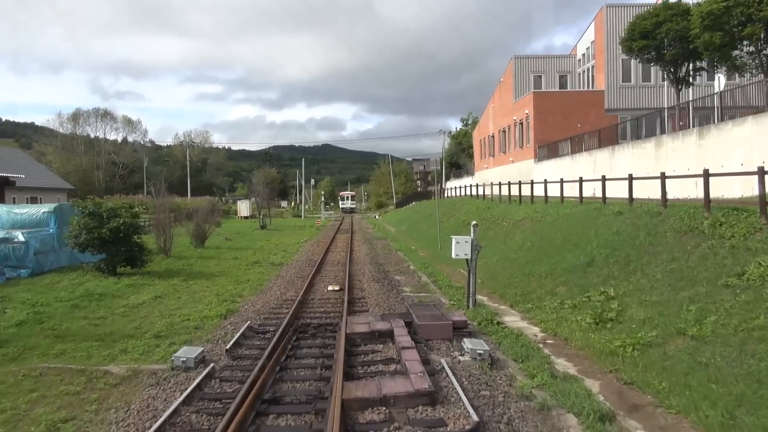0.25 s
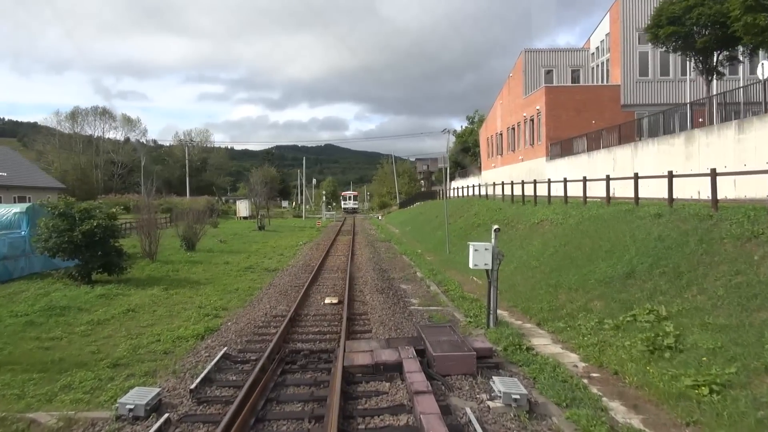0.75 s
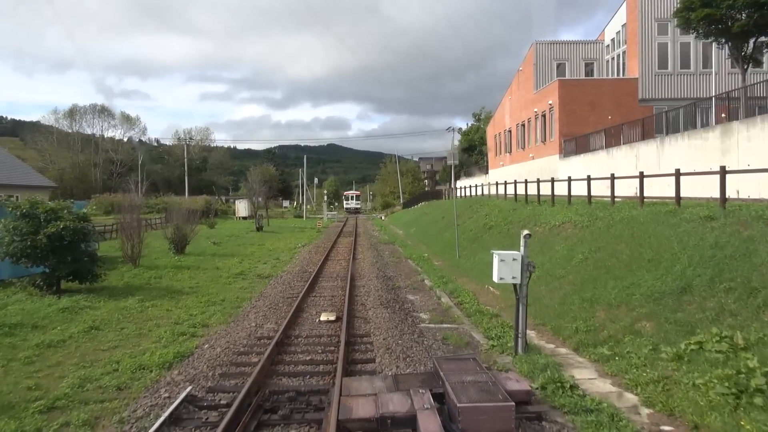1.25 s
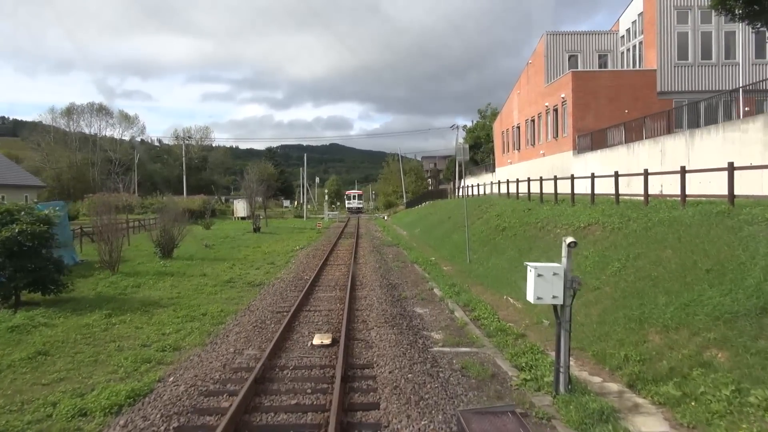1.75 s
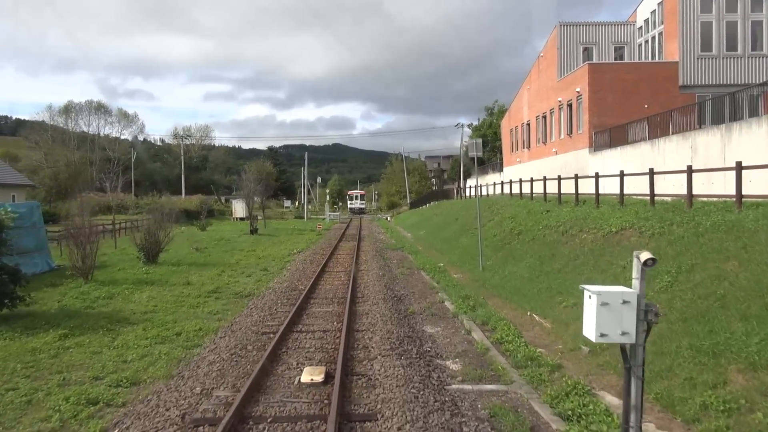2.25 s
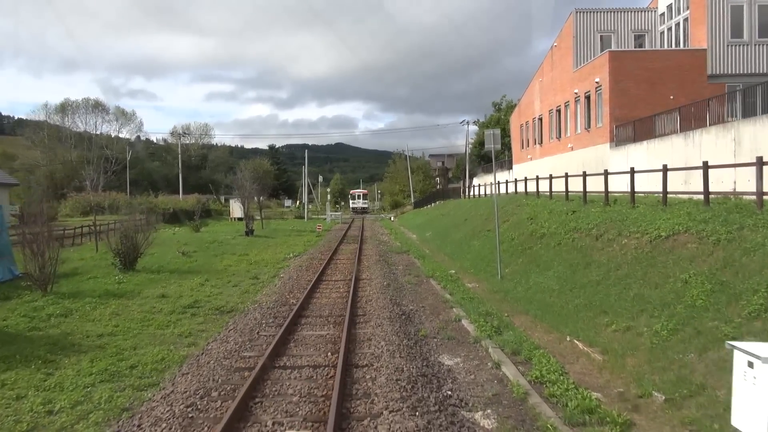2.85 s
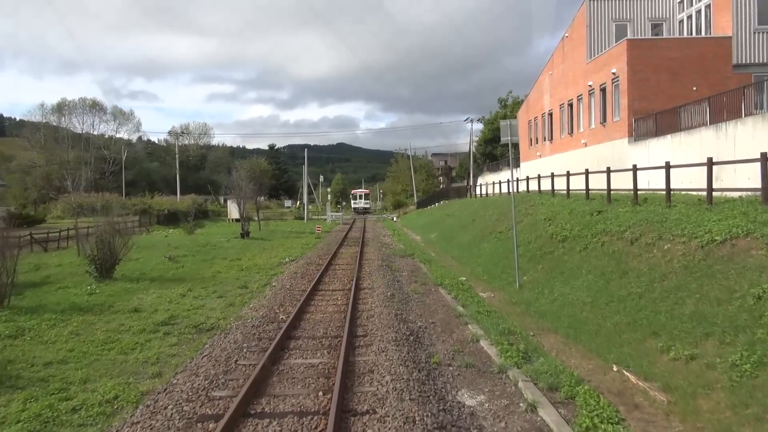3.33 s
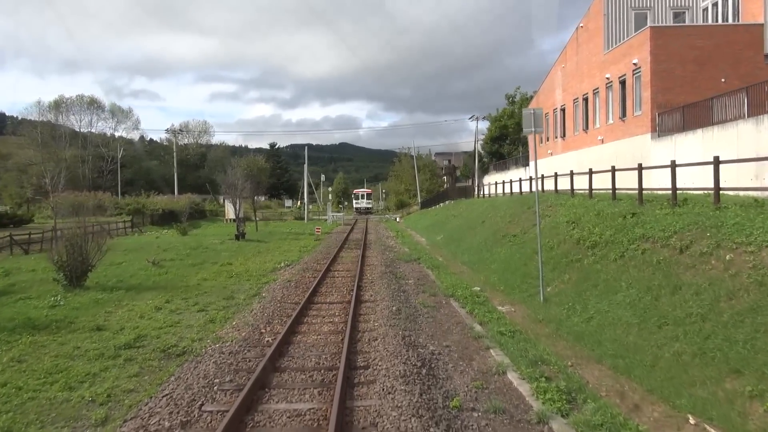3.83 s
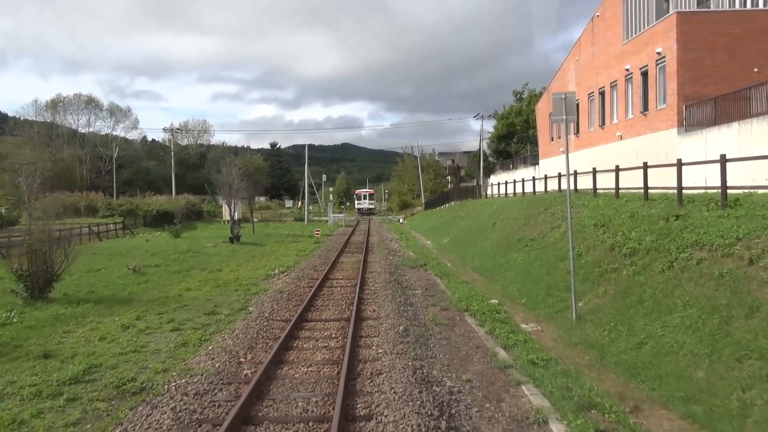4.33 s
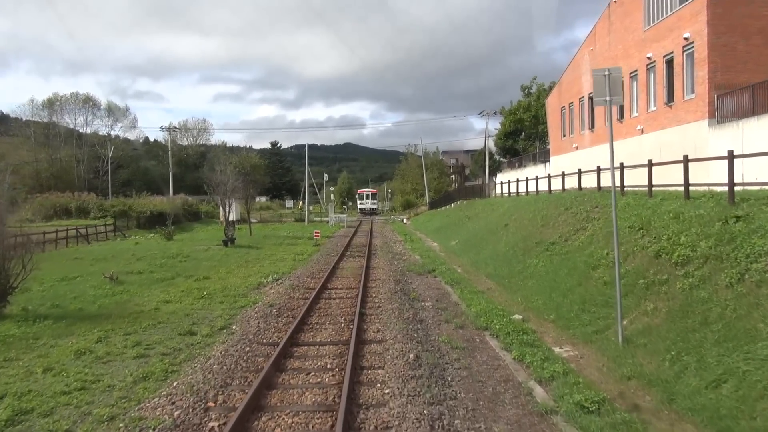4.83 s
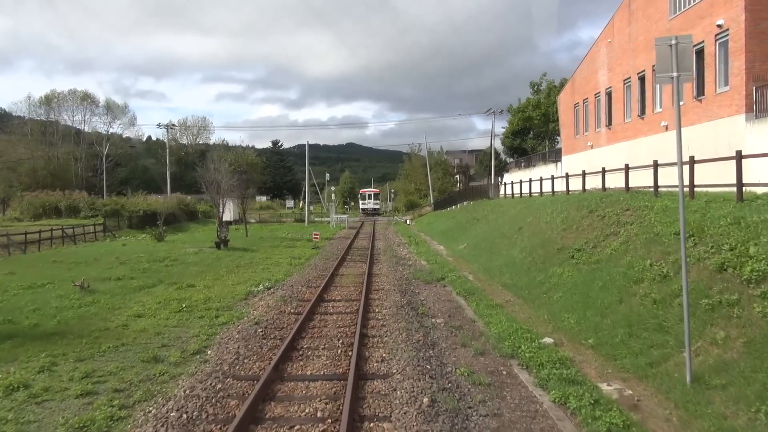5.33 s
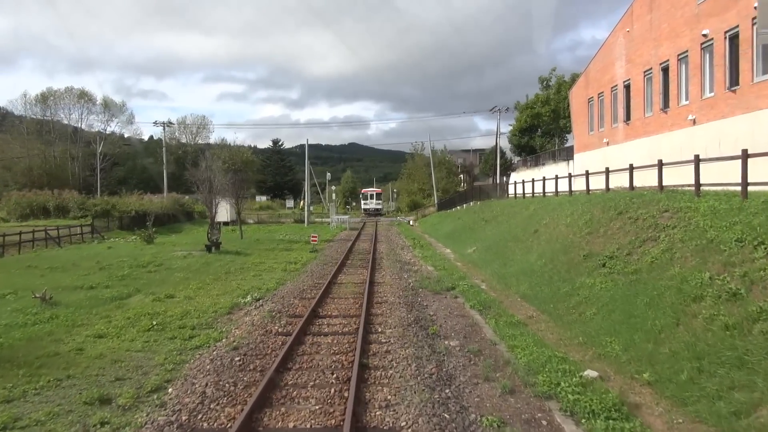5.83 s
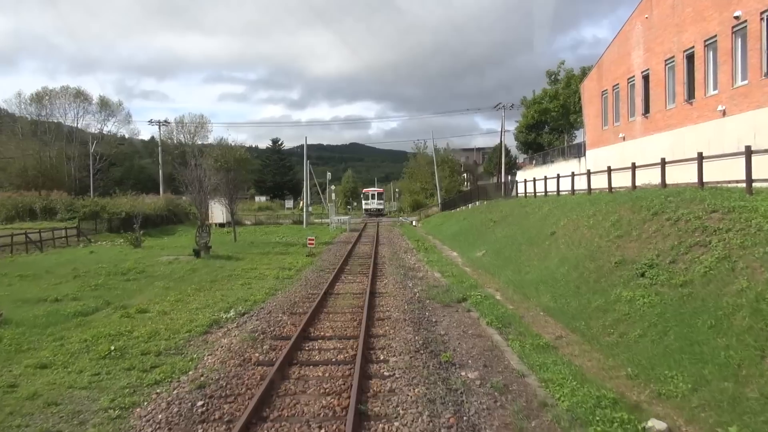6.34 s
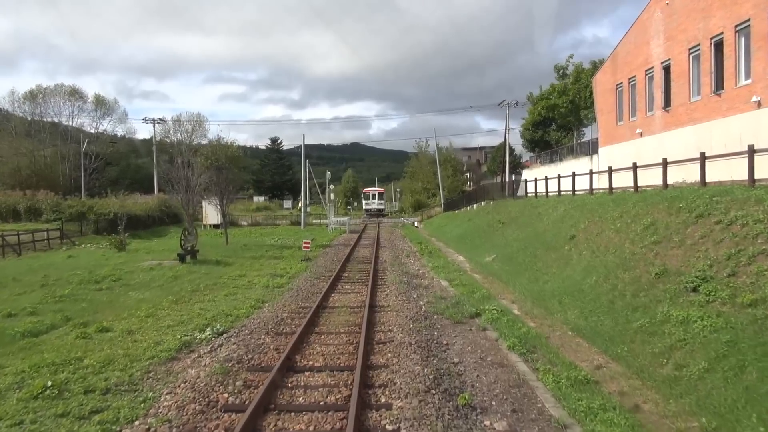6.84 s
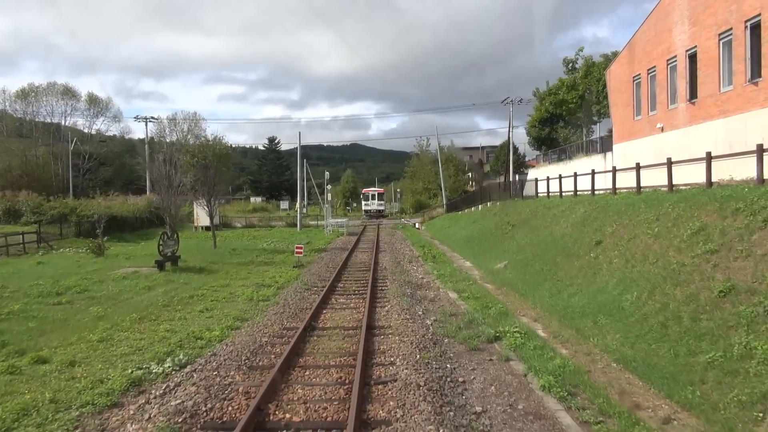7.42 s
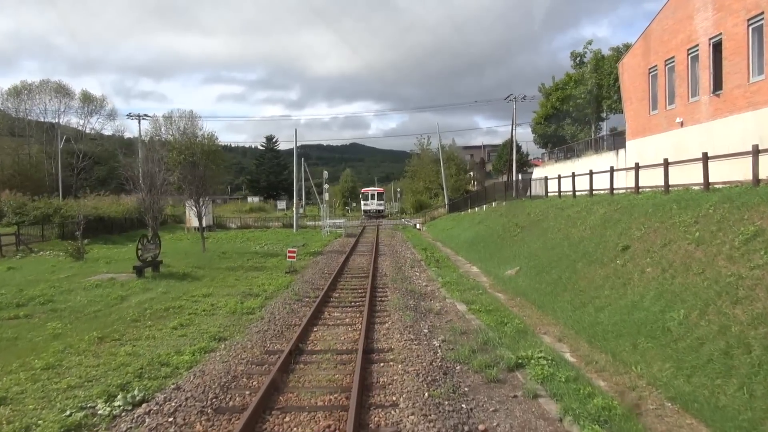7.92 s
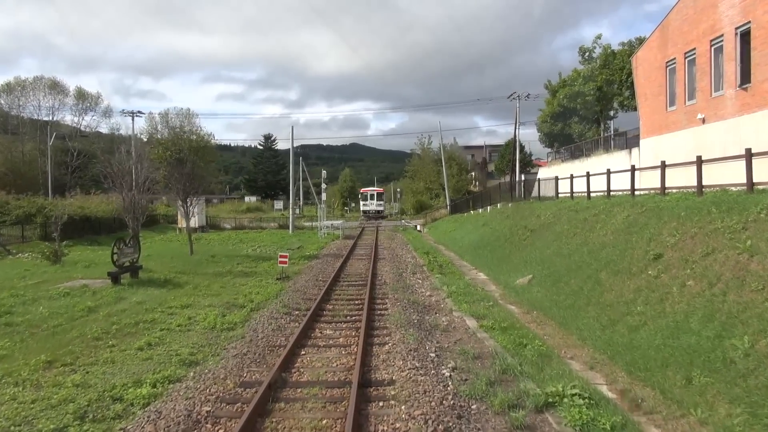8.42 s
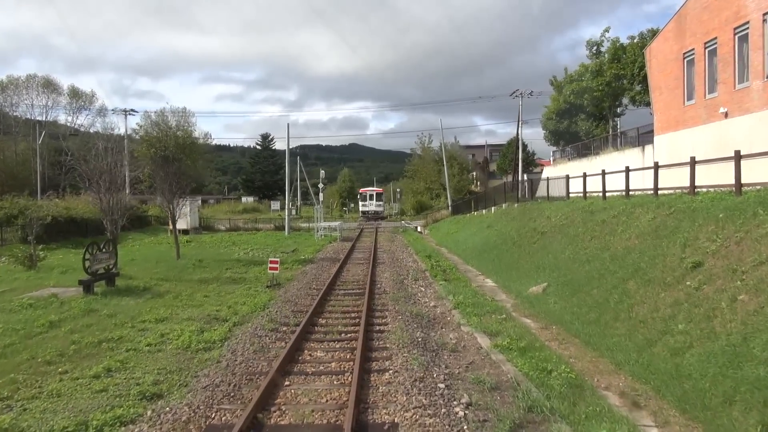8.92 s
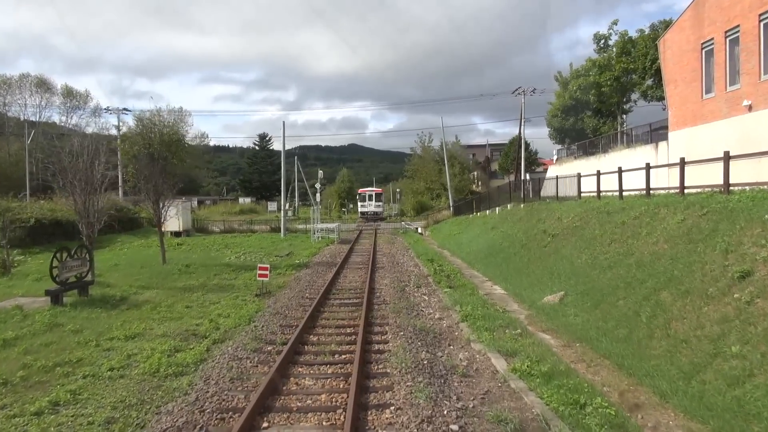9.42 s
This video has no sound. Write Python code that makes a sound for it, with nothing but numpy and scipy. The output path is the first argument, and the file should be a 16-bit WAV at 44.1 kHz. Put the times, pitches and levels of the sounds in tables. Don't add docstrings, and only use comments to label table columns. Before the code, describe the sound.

Inside a slow diesel railcar cab, engine hum and airy hiss run under booming rail-joint thumps, then brake-valve puffs, metallic clinks and faint squeaks.

```python
import sys
import numpy as np
from scipy import signal
from scipy.fft import rfft, irfft, next_fast_len
from scipy.io import wavfile
from scipy.ndimage import uniform_filter1d, minimum_filter1d, map_coordinates

SR = 44100
rng = np.random.default_rng(int(sys.argv[2]) if len(sys.argv) > 2 else 0)


def wav_out(sig):
    wavfile.write(sys.argv[1], SR, np.round(np.clip(np.atleast_2d(sig).T, -1, 1) * 32767).astype(np.int16))


def magnitude_from_level(level_db):
    exponent = np.asarray(level_db, float) / 20
    return 10 ** exponent


N = 426447

# (multiple of firing rate, level [dB])
HUM = [(1, -50), (4, -35), (8, -50), (9.5, -50)]
# (frequency [Hz], level per Hz [dB])
DRONE = [(260, -35), (440, -3), (503, -1.5), (589, 1.5), (690, -5.5), (790, 0.5), (858, 1.5), (907, -4.5),
         (1020, -5), (1170, -11), (1320, -12.5), (1420, -49), (1500, -11), (1950, -66), (3300, -120)]
# (frequency [Hz], level per Hz [dB])
HISS = [(710, -6.5), (1200, -6), (1320, -2.5), (1940, -2.5), (3180, -8.5), (4480, -11.5), (4930, -13.5),
        (5310, -12.5), (6650, -17), (7330, -13.5), (10400, -22), (11700, -24.5), (15500, -34.5)]
# (time [s], level [dB])
AIR = [(0.0, -44.5), (1.05, -43.5), (4.07, -43.5), (5.01, -45.5), (5.25, -45), (6.14, -42), (6.33, -43.5),
       (8.73, -43.5), (8.89, -43.5), (9.67, -43)]

# (frequency [Hz], width [Hz], level [dB])
CAB_AIR = [(67.7, 12.7, -13.5), (94.24, 12.4, 0), (100.7, 8.2, 0.5), (113.15, 8.4, -5), (130.2, 14, -10.5),
           (141.7, 18, -22)]
# (frequency [Hz], width [Hz], level [dB])
BENDING = [(47, 10.3, -1.5), (61.5, 14.5, -1.5)]
# (frequency [Hz], width [Hz], level [dB])
PANELS = [(161.3, 16.6, -1), (182, 11.3, -0.5), (217.8, 25.8, 0.5), (231.6, 18, -5), (246.4, 13.3, -5.5),
          (278.6, 22, -1.5), (305.8, 60, -6), (368, 32, -6), (414, 31, -5.5)]
# (time [s], level [dB])
TRACK = [(0.0, -40), (0.27, -26), (0.89, -22), (1.26, -25.5), (1.83, -23), (2.02, -31), (2.21, -26.5),
         (3.58, -24.5), (3.82, -22), (4.2, -23), (4.39, -24), (4.49, -25.5), (5.01, -25), (7.06, -23.5),
         (7.94, -21), (8.56, -23), (8.99, -24), (9.67, -24)]
# (time of peak [s], cab boom [dB], bending [dB], floor panels [dB])
JOLTS = [(0.01, -13.5, -27, -28), (0.41, -25, -46, -51), (0.73, -19, -26, -33), (0.97, -16, -34, -42),
         (1.20, -42, -28, -36), (1.29, -16.5, -43, -28.5), (2.17, -27, -42, -32.5), (1.64, -15, -42, -31),
         (1.84, -15.5, -20, -27), (1.95, -14.5, -30, -31), (2.32, -21.5, -24, -42), (3.00, -35, -23, -49),
         (3.30, -25, -28, -35), (3.69, -14.5, -40, -52), (3.98, -16.5, -38, -52), (4.27, -10.5, -23, -30.5),
         (4.41, -10.5, -36, -47), (4.798, -8, -24, -32), (7.84, -28, -32, -27.5), (5.50, -22.5, -42, -30),
         (6.04, -19, -33, -27), (6.21, -19.5, -44, -35), (6.52, -41, -19.5, -38), (7.09, -20, -32, -32),
         (7.29, -20.5, -45, -33.5), (7.66, -24, -19, -24.5), (8.05, -17, -58, -46), (8.56, -27, -28, -56),
         (8.96, -25, -27, -26), (9.54, -25, -36, -33), (0.22, -25, -40, -33), (0.62, -25, -40, -37),
         (1.44, -19.5, -44, -31), (2.53, -25, -40, -43), (3.15, -26, -35, -36), (4.92, -19.5, -40, -48),
         (5.28, -20.5, -40, -49), (5.78, -23.5, -38, -42), (6.71, -19, -40, -35), (7.2, -19.5, -39, -49),
         (8.26, -25, -45, -31), (8.73, -21, -40, -45), (9.05, -21, -37, -45), (9.41, -19, -32, -36),
         (2.82, -28, -42, -33)]
# (time [s], frequency [Hz], level [dB], t60 [s])
THUDS = [(7.635, 150, -22, 0.64), (6.6, 285, -29, 0.47), (5.49, 190, -25, 0.25), (6.02, 220, -23, 0.34),
         (1.6, 140, -18, .5), (1.91, 312, -24.5, 0.28), (3.8, 170, -29, .5), (2.1, 180, -26, 0.72),
         (4, 222, -31, 0.59), (1.1, 150, -32, .3), (4.29, 210, -28, 0.33), (10, 230, -33, 0.33)]
# (time [s], level [dB], frequency [Hz], t60 [s])
KNOCKS = [
    (8.938, -19, 222, .25),
    (8.938, -24, 420, .12),
    (6.02, -27, 350, .15),
    (5.485, -27, 350, .12),
    (9.43, -36, 900, .12),
    (9.38, -32, 520, .12),
]

# (start [s], length [s], frequency [Hz], peak level [dB], octave level [dB])
SQUEAKS = [
    (7.242, .3, 6600, -46, -18),
    (7.63, .34, 6470, -47, -14),
    (9.603, .2, 6420, -45.5, -24),
]

# (start [s], end [s], level [dB])
LEAK = [
    (5.132, 6.156, -50),
    (9.5, 9.71, -55),
]
# (frequency [Hz], width [Hz], level [dB])
WHISTLES = [(1910, 300, 7), (2310, 390, 5.5), (2920, 180, 1), (4850, 260, 2.5), (5260, 130, 5),
            (7350, 90, -8), (11500, 200, -7)]
# (start [s], end [s], frequency [Hz], level [dB], fade [dB/s], glide [Hz/s])
PIPE = [
    (5.13, 5.95, 10100, -70, -6, -200),
    (5.9, 5.99, 10050, -56, 5, -2500),
    (5.92, 6.12, 9560, -53, 30, -100),
]

# (time [s], frequency
# [Hz], level [dB], t60 [s])
CLINKS = [(5.047, 4436, -38, .3), (5.064, 3666, -38, 0.17), (5.055, 6050, -43, .2), (5.052, 5421, -41, .3),
          (5.05, 6891, -42, .23), (5.043, 10430, -42, .3), (5.05, 7967, -43, .25), (5.048, 11290, -42, .17),
          (5.067, 3800, -38, .22), (5.055, 2600, -44, 0.44), (6.179, 4183, -37, 0.13),
          (6.179, 3440, -36, .25), (6.18, 3596, -37, .2), (6.187, 3946, -42, .25), (6.188, 8500, -41, .1),
          (6.281, 5120, -42, .22), (6.278, 5500, -41, .2), (6.28, 4059, -42, .27), (6.279, 6794, -48, .3),
          (8.845, 2600, -42, .3), (8.855, 2800, -36, .45), (8.861, 3700, -33, .45), (8.862, 4800, -36, .15),
          (8.858, 6200, -40, .22), (8.885, 5120, -40, .3), (8.856, 11300, -32, .2), (8.93, 2891, -33, 0.35),
          (8.93, 2805, -38, .28), (8.93, 3435, -35, .12), (8.929, 4100, -34, .15), (8.935, 1895, -38, .16),
          (8.93, 5383, -40, .22), (8.93, 3036, -38, .29), (9.328, 4000, -38, .12), (9.324, 7725, -38, .3),
          (9.33, 5146, -39, .3), (9.367, 5803, -34, .15), (9.369, 8200, -37, .3), (9.368, 6500, -38, .2),
          (9.369, 2600, -41, .15), (9.408, 6255, -36, .2), (9.42, 8177, -41, .45), (9.421, 4600, -35, .2),
          (9.425, 3600, -41, .2), (9.435, 2606, -40, .26), (9.44, 4441, -39, .3), (9.478, 4060, -41, .2),
          (9.532, 5250, -48, 0.11), (9.59, 5270, -44, .15), (9.64, 5270, -52, .1)]
# (time [s], peak level [dB], dull part [dB], bright part [dB], t60 [s])
PUFFS = [(1.316, -38, 1, -32, 0.22), (4.2422, -46, 15.5, -21, 0.19), (4.7795, -34.5, 3, -17, 0.38),
         (5.031, -30.5, -13, -25, 0.23), (5.0485, -25.5, -7, -9, 0.25), (6.1795, -29, -24, -3, 0.25),
         (6.2778, -28, -6, -15, 0.3), (7.93, -36, -6, -24, 0.2), (8.2524, -34, -2, -43, 0.53),
         (8.839, -42, -1, -25, 0.27), (8.854, -17.5, -13, -4, 0.23), (8.928, -22, -1, -24, 0.27),
         (8.943, -27, 1, -24, 0.22), (9.319, -21.5, -6.5, -5, 0.4), (9.367, -19.5, -6.5, -4, 0.34),
         (9.39, -26, -6, -8, .2), (9.4198, -21.5, -12, -10, 0.2), (8.8, -44, -3, -19, 0.9),
         (9.27, -38, -9, -12, 1.2), (9.445, -35, -2, -16, 0.33), (9.105, -36.5, -6, -12, 2)]
# (frequency [Hz], width [Hz], level [dB])
APPLY = [(2520, 30, -11), (3690, 100, -8), (4480, 12, -3), (5460, 55, -2), (6550, 70, -9), (8000, 60, -0.5),
         (10350, 52, -4), (10900, 56, -2), (11900, 80, -3), (13800, 60, -1)]
EASE = [(3380, 90, 1), (3650, 60, 0), (4130, 170, -3), (8200, 500, 1), (10700, 36, -10), (11100, 58, -10)]
LAP = [(2300, 61, -8), (4000, 69, -1), (5100, 31, -8), (5550, 90, -4), (6800, 56, -21), (11100, 44, -16)]
DUMP = [(2840, 45, -17), (4070, 99, 1), (4930, 350, -5.5), (6280, 40, 3), (8650, 68, -9), (11200, 370, -3),
        (13300, 99, -34)]
STOP = [(1800, 65, -1.5), (2900, 140, 5), (4080, 56, -5), (5200, 47, -6), (6260, 43, -19)]
RETURN = [(2800, 48, -16), (5760, 43, 0), (6600, 46, -6), (8160, 250, -1), (9200, 61, -15), (11200, 83, -7),
          (14200, 830, -11)]
SEAT = [(3580, 45, -4), (4150, 40, 0), (4400, 60, -4), (6200, 34, -3), (8100, 42, -8), (10400, 39, -1),
        (11340, 38, -3), (11850, 67, -4), (13800, 300, -9)]
# (held until [s], housing modes)
POSITIONS = [(5.04, []), (5.5, APPLY), (6.25, EASE), (6.5, LAP), (8.82, []),
             (8.9, DUMP), (9.1, STOP), (9.3, []), (9.4, RETURN), (10, SEAT)]

# (frequency [Hz], level [dB])
STRAY = [(60, -34), (200, -18.5), (400, -15), (570, -11.5), (700, -15.5), (1300, -10), (2000, -9),
         (4700, -10), (5400, -11), (7500, -7), (10000, -8.5), (11300, -10), (11800, -46)]
# (frequency [Hz], level [dB])
LEAN = [(60, -1), (140, -1), (300, 2.5), (600, 2), (1000, -0.5), (15000, 0)]
# (frequency [Hz], share of time)
OPEN = [(250, 1), (330, .6), (600, .55), (700, .11), (1400, .07), (1600, .02), (4900, .015), (5300, 1)]

FIRING_HZ = 28.42
DRONE_DB, DRONE_SHAKES, DRONE_FOLLOWS = -40.5, 0.3, 0.43
HISS_DB = 0.13
SUB_DB, SUB_FOLLOWS, PANEL_DB, PANEL_FOLLOWS = -33.5, 0.32, -34.5, 0.45
JOLT_RISE_S, BOOM_T60_S, SUB_T60_S, PANEL_T60_S = 0.067, 0.66, 0.31, 0.77
SQUEAK_RISE_S, SQUEAK_FADE_DB_PER_S, SQUEAK_HZ_PER_DB = 0.064, 60, 4
LEAK_RISE_S, LEAK_FLUTTER_DB = 0.04, 1.5
PUFF_RISE_S, PUFF_HOLD_S = 0.0053, 0.015
RISE_GROWS = 0.4
HOUSING_TOP_HZ = 14300


def unit(x):
    return x / np.sqrt(np.mean(x ** 2, axis=-1, keepdims=True) + 1e-20)


def along(points, hz):
    f, v = np.transpose(points)
    return np.interp(np.log(hz + 1), np.log(f + 1), v)


def curves(rows):
    s, *cols = np.transpose(rows)
    return [np.interp(np.arange(N) / SR, s, c) for c in cols]


def wobble(rate, size=N):
    knots = rng.standard_normal(int(size * rate / SR) + 4)
    return map_coordinates(knots, [np.arange(size) * rate / SR])


def filtered(x, response):
    n = x.shape[-1]
    m = next_fast_len(n + 8192)
    return irfft(rfft(x, m) * response(np.fft.rfftfreq(m, 1 / SR)), m)[..., :n]


def modes(table):
    def response(f):
        return sum((-1) ** k * magnitude_from_level(db) * 1j * f * w / (c * c - f * f + 1j * f * w)
                   for k, (c, w, db) in enumerate(table))
    return response


def noise(response, n=N):
    return unit(filtered(rng.standard_normal((2, n)), response))


def steadied(x, seconds, share):
    size = int(seconds * SR)
    power = np.abs(uniform_filter1d(uniform_filter1d(x ** 2, size), size))
    return unit(x / (power + 0.066) ** (np.clip(share, 0, 1) / 2))


def fuzzy(hz, spread_hz):
    turn = 2 * np.pi * np.cumsum(hz) / SR
    slow = lambda: noise(lambda f: 1 / (1 + (f / spread_hz) ** 2))
    return slow() * np.cos(turn) + slow() * np.sin(turn)


def spell(start, end, rise):
    t = np.arange(N) / SR
    return np.clip(np.minimum(t - start, end - t) / rise, 0, 1)


def shaking(steady_db, column, t60):
    t = np.arange(SR) / SR
    power = np.zeros(N + 2 * SR)
    swell = np.sin(np.pi / 2 * np.clip(t / JOLT_RISE_S, 0, 1)) ** 2
    shape = swell * magnitude_from_level(-60 * np.clip(t - JOLT_RISE_S, 0, 1) / t60)
    for row in JOLTS:
        start = round((1 + row[0] - JOLT_RISE_S) * SR)
        power[start:][:SR] += (magnitude_from_level(row[column]) * shape) ** 2
    return np.sqrt(power[SR:SR + N] + magnitude_from_level(steady_db) ** 2)


def rings(table, rise, rough_db, wavers):
    out, t = np.zeros(N + SR), np.arange(SR // 2) / SR
    for s, hz, db, t60 in table:
        pace = 4 * np.sqrt(hz)
        decay_db = db - 60 * t / np.clip(t60, 0.03, 0.45)
        shape = np.clip(t / rise, 0, 1) * magnitude_from_level(decay_db + rough_db * wobble(pace, size=len(t)))
        phase = 2 * np.pi * hz * t + wavers * wobble(pace, size=len(t))
        out[round(s * SR):][:len(t)] += shape * np.sin(phase)
    return out[:N]


def engine():
    jolt_db = 20 * np.log10(shaking(PANEL_DB, column=3, t60=0.42)) - PANEL_DB
    air_db, = curves(AIR)
    drone_db = DRONE_DB + DRONE_SHAKES * jolt_db + DRONE_FOLLOWS * (air_db - air_db.mean())
    hiss_db = HISS_DB + air_db
    turn = 2 * np.pi * np.cumsum(FIRING_HZ * (1 + 0.00555 * wobble(1.5))) / SR
    hum = sum(magnitude_from_level(db + 3 + 2.5 * wobble(3)) * np.sin(k * turn) for k, db in HUM)
    flutter = wobble(8.7)
    drone = steadied(noise(lambda f: magnitude_from_level(along(DRONE, f))), 0.025, share=0.27)
    drone = drone * magnitude_from_level(drone_db + flutter + 1.07 * wobble(28))
    hiss = noise(lambda f: magnitude_from_level(along(HISS, f)))
    hiss = hiss * magnitude_from_level(hiss_db + 0.5 * flutter + 0.54 * wobble(60))
    return hum * [[1], [0]] + drone + hiss


def body():
    rough_db, = curves(TRACK)
    swing_db = rough_db - rough_db.mean()
    cab = lambda f: modes(CAB_AIR)(f) / (1 + (f / 142) ** 8) / (1 + (55 / (f + 1)) ** 6)
    frame = lambda f: modes(BENDING)(f) / (1 + (40 / (f + 1)) ** 6) / (1 + (f / 80) ** 4)
    floor = lambda f: modes(PANELS)(f) / (1 + (135 / (f + 1)) ** 8) / (1 + (f / 470) ** 8)
    boom = shaking(rough_db, column=1, t60=BOOM_T60_S) * steadied(noise(cab), 0.021, share=0.42)
    sub_gain = shaking(SUB_DB + SUB_FOLLOWS * swing_db, column=2, t60=SUB_T60_S)
    sub = sub_gain * steadied(noise(frame), 0.11, share=0.34)
    panel_gain = shaking(PANEL_DB + PANEL_FOLLOWS * swing_db, column=3, t60=PANEL_T60_S)
    panels = panel_gain * magnitude_from_level(1.24 * wobble(30)) * steadied(noise(floor), 0.062, share=0.23)
    return boom + sub + panels


def thuds():
    return rings(THUDS, rise=0.017, rough_db=1.2, wavers=0.4)


def knocks():
    t, out = np.arange(N) / SR, np.zeros(N)
    for s, db, hz, t60 in KNOCKS:
        age = np.clip(t - s, 0, 1)
        out += magnitude_from_level(db - 60 * age / t60) * np.sin(2 * np.pi * hz * age)
    return out * np.ones((2, 1))


def squeaks():
    out, t = np.zeros((2, N)), np.arange(N) / SR
    for s, length, hz, db, octave_db in SQUEAKS:
        age = np.clip(t - s - SQUEAK_RISE_S, -1, 1)
        down_db = np.maximum(-14 * age / SQUEAK_RISE_S, SQUEAK_FADE_DB_PER_S * age)
        pitch = hz - SQUEAK_HZ_PER_DB * down_db
        tone = fuzzy(pitch, spread_hz=190) + magnitude_from_level(octave_db) * fuzzy(2.025 * pitch, spread_hz=320)
        out += spell(s, s + length, rise=0.02) * magnitude_from_level(db - down_db) * tone
    return out


def leak():
    t = np.arange(N) / SR
    flow = sum(magnitude_from_level(db) * spell(s, end, LEAK_RISE_S) for s, end, db in LEAK)
    flow = flow * magnitude_from_level(LEAK_FLUTTER_DB * wobble(19))
    out = flow * steadied(noise(lambda f: modes(WHISTLES)(f) ** 2), 0.03, share=0.3)
    for s, end, hz, db, fade, glide in PIPE:
        age = np.clip(t - s, 0, 1)
        pitch = hz * (1 + 0.006 * wobble(6)) + glide * age
        out += spell(s, end, LEAK_RISE_S) * magnitude_from_level(db - fade * age) * fuzzy(pitch, spread_hz=120)
    return out


def clinks():
    return rings(CLINKS, rise=0.003, rough_db=3, wavers=0.9)


def valve():
    out, t = np.zeros((2, N + SR)), np.arange(SR // 2) / SR
    for s, db, dull_db, bright_db, t60 in PUFFS:
        housing = next(table for until, table in POSITIONS if s < until)
        tilt = [(500, dull_db + 12.5), (1400, dull_db + 5.0), (2300, 0.38 * dull_db + 0.5), (3200, 0.0),
                (7000, -2.5), (11500, bright_db + 1.5), (14000, bright_db - 17), (15000, bright_db - 36)]
        rise = PUFF_RISE_S * magnitude_from_level(RISE_GROWS * (db + 24))
        decay = magnitude_from_level(-60 * np.clip(t - rise - PUFF_HOLD_S, 0, 1) / max(t60, 0.03))
        lumps = magnitude_from_level(0.74 * wobble(126, size=len(t)) + 0.54 * wobble(42, size=len(t)))
        jet = np.clip(t / rise, 0, 1) * decay * lumps * rng.standard_normal((2, len(t)))
        walls = modes([(c, w + 120, g) for c, w, g in housing])
        ring = filtered(jet, lambda f: walls(f) / (1 + (f / HOUSING_TOP_HZ) ** 16))
        puff = filtered(jet, lambda f: magnitude_from_level(along(tilt, f))) + magnitude_from_level(7.0) * ring
        out[:, round((s - 0.003) * SR):][:, :len(t)] += magnitude_from_level(db - 5.5) * puff
    return out[:, :N]


def scene():
    mid, stray = engine() + body() + thuds() + knocks() + squeaks() + leak() + clinks() + valve()
    side = filtered(stray, lambda f: magnitude_from_level(along(STRAY, f)))
    return np.array([mid + side, mid - side])


def patchy(side):
    hz, t, z = signal.stft(side, SR, nperseg=1024)
    band = (10 * np.log2(1 + hz / 700)).astype(int)
    chance = uniform_filter1d(rng.standard_normal((band.max() + 1, len(t))), size=5, axis=1)
    rank = chance.argsort(axis=1).argsort(axis=1) / len(t)
    is_open = rank[band] < along(OPEN, hz)[:, None]
    return signal.istft(z * is_open, SR, nperseg=1024)[1][:N]


def top_cut(x):
    return signal.sosfilt(signal.butter(12, 15650, fs=SR, output="sos"), x)


def record(dry):
    lean = filtered(dry, lambda f: magnitude_from_level(along(LEAN, f) * np.array([[0.5], [-0.5]])))
    mid, side = lean.mean(axis=0), patchy((lean[0] - lean[1]) / 2)
    pair = np.array([mid + side, mid - side])
    need = np.minimum(1, 0.71 / (np.abs(pair).max(axis=0) + 1e-9))
    gain = uniform_filter1d(minimum_filter1d(need, size=1800), size=1500)
    return top_cut(pair * gain)


dry = scene()
out = record(dry)
wav_out(out)
```